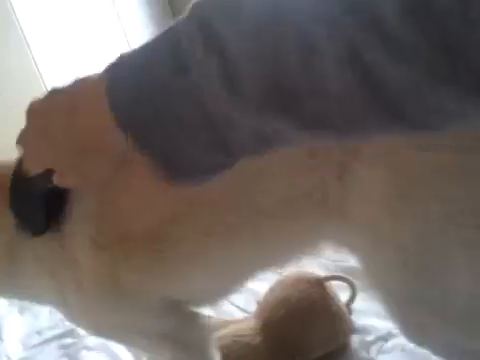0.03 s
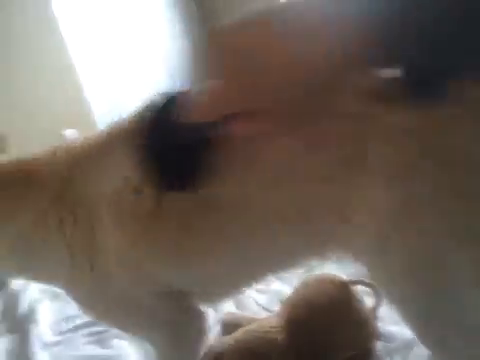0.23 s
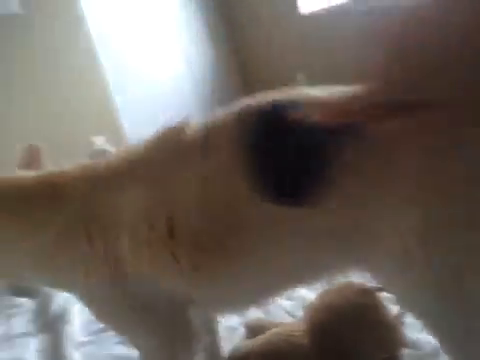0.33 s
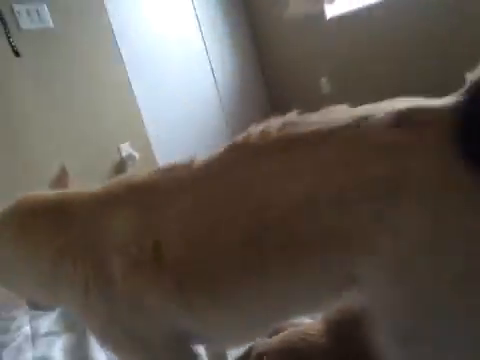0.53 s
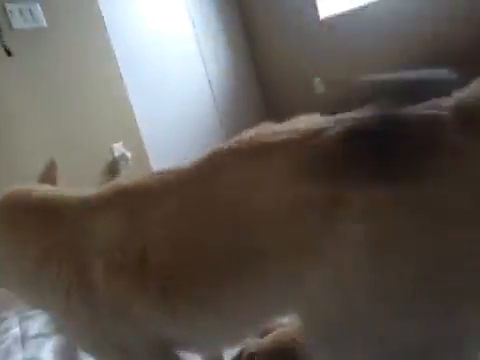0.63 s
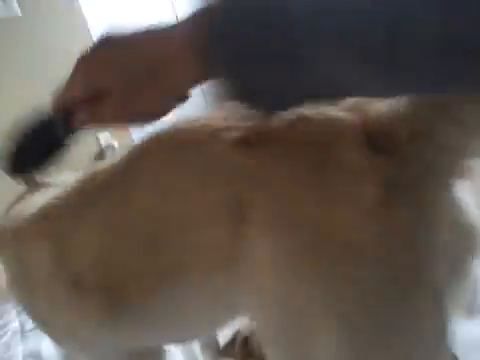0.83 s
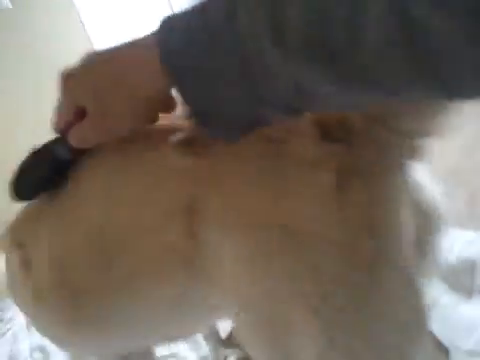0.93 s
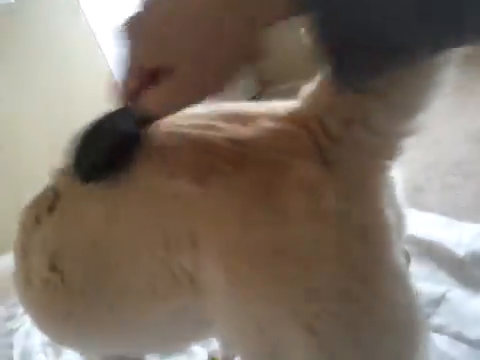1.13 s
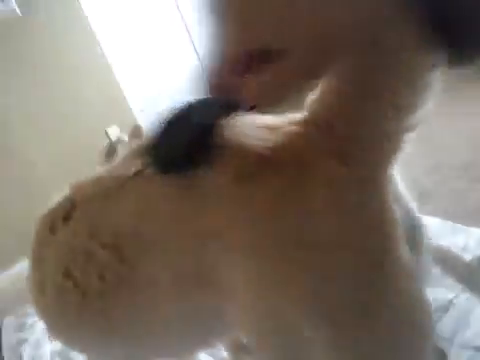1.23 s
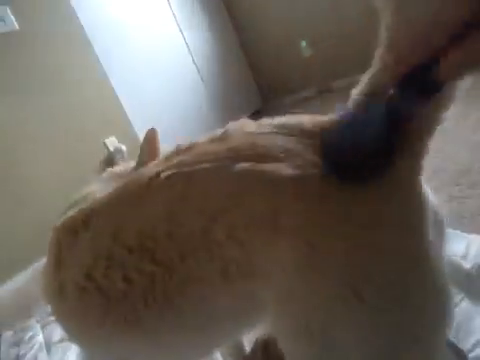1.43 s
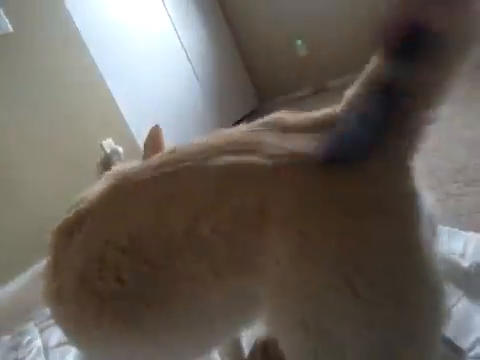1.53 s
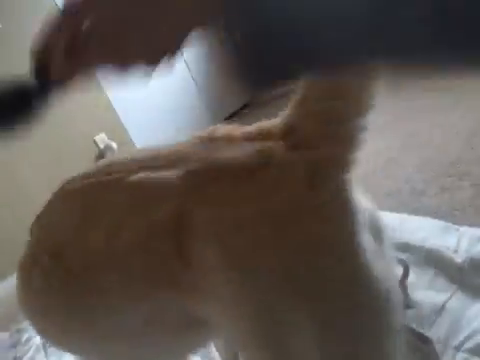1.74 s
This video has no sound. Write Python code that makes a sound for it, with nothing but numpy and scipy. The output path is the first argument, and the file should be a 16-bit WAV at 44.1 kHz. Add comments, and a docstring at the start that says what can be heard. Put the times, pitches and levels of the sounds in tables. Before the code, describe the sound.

A brush makes two scratchy, hissing strokes through a dog's fur, close by.

```python
"""Two scratchy, hissing strokes of a plastic brush along a dog's back, close by in a quiet room.
Thousands of hairs slip off the bristles from neck to rump and sound the hollow back of the brush.
The brush knocks as it lands and catches in the coat. The passing arm puffs air at the microphone,
its sleeve rustles faintly, and the room hums low underneath."""
import sys
import numpy as np
from scipy import signal
from scipy.fft import rfft, irfft, next_fast_len
from scipy.io import wavfile
from scipy.ndimage import map_coordinates

SR = 44100
rng = np.random.default_rng(int(sys.argv[2]) if len(sys.argv) > 2 else 0)


def unload_wav(signal):
    """Save mono or channel-first audio to the path in sys.argv[1] as 16-bit WAV at rate SR, clipped to [-1, 1]."""
    wavfile.write(
        sys.argv[1],
        SR,
        np.round(np.clip(np.atleast_2d(signal).T, -1, 1) * 32767).astype(np.int16),
    )


N = 79380


def brush_strokes():
    """Hairs slip off the bristles in four layers: hollow body, scratch, hiss and a top sheen."""
    # Drag, one table a stroke. Each row: time in seconds, body and scratch levels in dB before trim.
    drags = [
        [(0.16, -50, -59), (0.248, -43.5, -48.5), (0.254, -43, -51), (0.382, -39.5, -39.5),
         (0.464, -40.5, -37.5), (0.564, -41.5, -45), (0.67, -60.5, -63), (0.72, -62.5, -69)],
        [(0.99, -62, -69), (1.04, -63, -57), (1.064, -57.5, -57.5), (1.2, -48.5, -47), (1.208, -50.5, -44),
         (1.304, -45.5, -47.5), (1.452, -43, -44.5), (1.536, -52.5, -56.5), (1.61, -68, -73), (1.62, -66, -85)],
    ]
    # Treble, one table a stroke. Each row: time in seconds, hiss and sheen levels in dB before trim.
    hisses = [
        [(0.16, -65.5, -68), (0.212, -59, -59), (0.346, -55.5, -53.5), (0.39, -51, -51), (0.43, -50, -49.5),
         (0.582, -55, -58.5), (0.682, -78, -76), (0.69, -79, -88), (0.7, -87, -80)],
        [(0.99, -81, -84), (1.002, -68, -75), (1.14, -56, -58.5), (1.214, -52.5, -56), (1.358, -57.5, -56.5),
         (1.442, -56.5, -52), (1.534, -67, -59.5), (1.59, -78, -73), (1.6, -89, -86)],
    ]
    # Resonances of the brush's back. Each row: centre in Hz, width in Hz, lift in dB.
    back_modes = [(310, 18, 2), (500, 12, -2.5), (673, 91, 6.5), (785, 120, 6), (1080, 120, 0.5),
                  (1440, 52, 2), (1710, 110, 1.5), (2530, 150, 0), (4310, 420, 1.5)]
    # Tone colours of the four layers. Each row: frequency in Hz, relative level in dB.
    body_eq = [(120, -15), (210, -12.5), (300, -2.5), (450, -0.5), (700, -5.5), (1000, 0), (1300, -2),
               (1750, -4.5), (2300, -10), (3500, -44), (7000, -94)]
    scratch_eq = [(700, -43), (1500, -3.5), (2200, -1.5), (2900, -2), (3500, -1.5), (4600, -3.5),
                  (5500, -6), (7000, -30), (11000, -65)]
    hiss_eq = [(2500, -32), (5000, -3), (6200, 2.5), (7500, 0), (8800, -9), (11000, -22), (15000, -17)]
    sheen_eq = [(5000, -49), (8000, -0.5), (9800, 0), (12500, -0.5), (14200, -1.5), (15300, -4)]
    body_trim_db, scratch_trim_db, hiss_trim_db, sheen_trim_db = -0.9, -0.6, 1.5, 1
    out = np.zeros(N)
    for drag, treble in zip(drags, hisses):
        body_db, scratch_db = stroke_levels(drag)
        hiss_db, sheen_db = stroke_levels(treble)
        body = coloured(hair_slips(scratch_db), body_eq, back_modes)
        scratch = coloured(hair_slips(scratch_db), scratch_eq, back_modes)
        hiss = coloured(hair_slips(scratch_db), hiss_eq)
        sheen = coloured(hair_slips(scratch_db), sheen_eq)
        out += amp(body_db + body_trim_db) * body + amp(scratch_db + scratch_trim_db) * scratch
        out += amp(hiss_db + hiss_trim_db) * hiss + amp(sheen_db + sheen_trim_db) * sheen
    return out


def hair_slips(drag_db, reference_db=-45, reference_per_s=9000, scatter_db=2):
    """Each slipping hair is a tiny click; a harder drag packs them denser at the same power."""
    chance = np.clip(reference_per_s * amp(drag_db - reference_db) / SR, .07, 1)  # per sample
    sizes = rng.choice([-1, 1], N) * amp(scatter_db * rng.standard_normal(N))
    return (rng.random(N) < chance) * sizes / np.sqrt(chance)


def stroke_levels(rows, fade_db_per_s=469):
    """One dB envelope for each level column, fading away before and after the stroke."""
    t = clock()
    times, *columns = np.transpose(rows)
    outside_s = np.maximum(times[0] - t, 0) + np.maximum(t - times[-1], 0)
    return [np.interp(t, times, db) - fade_db_per_s * outside_s for db in columns]


def hollow_rings():
    """The brush and the air under it ring while it lies flat on the coat."""
    # Each row, one ring: peak time in seconds, level in dB, half length in seconds, pitch and width in Hz.
    rings = [(0.456, -47.5, 0.075, 670, 109), (0.45, -47.5, 0.069, 2260, 900), (1.2, -54, 0.05, 754, 200),
             (1.278, -53.5, 0.13, 472, 108), (1.352, -49.5, 0.061, 708, 183), (1.444, -48, .05, 1850, 800)]
    out = np.zeros(N)
    for peak, db, half_length, hz, width in rings:
        bandpass = lambda f: 1j * f * width / (hz ** 2 - f ** 2 + 1j * f * width)
        cavity = filtered(rng.standard_normal(N), lambda f: bandpass(f) ** 2)
        out += swell(peak, db, half_length) * unit(cavity)
    return out


def landing_knocks(attack_s=0.00041):
    """The plastic back gives a short hollow tock as the brush lands."""
    # Landings. Each row: start in seconds, level in dB, pitch factor.
    landings = [(0.105, -46, 1.0), (0.1476, -29, 1.0), (0.972, -49, 0.6)]
    # Modes of the plastic. Each row: base frequency in Hz, relative level in dB, t60 in seconds.
    modes = [(936, 4, 0.013), (1410, -2.5, 0.013), (620, 0, 0.0072), (270, -13, 0.021), (3060, -11, 0.0079),
             (3840, -14, 0.0084)]
    out = np.zeros(N)
    for start, db, pitch in landings:
        t = np.maximum(clock() - start, 0)
        ring = sum(amp(mode_db - 60 * t / t60) * np.sin(2 * np.pi * hz * pitch * t)
                   for hz, mode_db, t60 in modes)
        out += amp(db) * ring * (1 - np.exp(-t / attack_s))
    return out


def bristle_catches(rise_s=0.0035):
    """A brief soft burst of slips as the bristles enter the fur."""
    # Catches in the coat. Each row: start in seconds, level in dB, t60 in seconds.
    catches = [(0.967, -54, 0.14), (1.026, -50, 0.12)]
    # Their tone colour. Each row: frequency in Hz, relative level in dB.
    catch_eq = [(300, -16), (1200, 1), (3200, 0), (5000, -9), (6500, -4), (14000, -22)]
    out = np.zeros(N)
    for start, db, t60 in catches:
        t = np.maximum(clock() - start, 0)
        envelope = amp(db - 60 * t / t60) * (1 - np.exp(-t / rise_s))
        out += envelope * coloured(hair_slips(db), catch_eq)
    return out


def air_puffs():
    """The moving arm wafts air over the microphone in soft, deep thumps."""
    # Wafts. Each row: peak time in seconds, level in dB, rise and fall time constants in seconds.
    puffs = [(0.476, -41, 0.0077, 0.15), (0.835, -54.5, 0.017, 0.061), (0.95, -53.5, 0.018, 0.11),
             (1.39, -59, 0.052, .08)]
    # Bass-heavy colour of the air. Each row: frequency in Hz, relative level in dB.
    air_eq = [(12, -23), (28, -1), (40, 6), (58, -1.5), (90, -9.5), (200, -28.5), (600, -65)]
    t = clock()
    envelope = sum(amp(db) * np.exp(-np.maximum((peak - t) / rise, (t - peak) / fall))
                   for peak, db, rise, fall in puffs)
    return envelope * coloured(rng.standard_normal(N), air_eq)


def sleeve_rustle():
    """A faint whisper of cloth as the arm swings back."""
    # Arm swings. Each row: peak time in seconds, level in dB, half length in seconds.
    swings = [(0.116, -66, .05), (0.853, -67, 0.11), (1.79, -68.5, 0.079)]
    # Bright colour of the cloth. Each row: frequency in Hz, relative level in dB.
    cloth_eq = [(300, -28), (1200, -7), (4000, -1), (9000, 0.5), (14500, -7)]
    return sum(swell(*swing) for swing in swings) * coloured(rng.standard_normal(N), cloth_eq)


def room_reverb(x, t60_s=0.09, wet_db=-12.5):
    """The short answer of a softly furnished room."""
    t = np.arange(SR // 2) / SR
    tail = rng.standard_normal(len(t)) * amp(-60 * t / t60_s)
    return amp(wet_db) * signal.fftconvolve(x, tail / np.linalg.norm(tail))[:N]


def room_tone(noise_db=-56, hum_hz=77.3, hum_db=-56.5, waver_db=1.5):
    """A bed of low rumble, faint hiss and a wavering hum."""
    # Colour of the rumble and hiss. Each row: frequency in Hz, relative level in dB.
    room_eq = [(15, -8), (40, -2.5), (80, -3), (120, -9), (180, -15), (300, -13.5), (500, -25), (1000, -22),
               (2000, -25.5), (4000, -32), (9000, -34.5), (14500, -38.5)]
    phase = 2 * np.pi * hum_hz * clock() + 0.9 * wobble(5.4)
    hum = unit(amp(waver_db * wobble(8.86)) * np.sin(phase))
    return amp(hum_db) * hum + amp(noise_db) * coloured(rng.standard_normal(N), room_eq)


def amp(db):
    """Decibels to gain."""
    return 10 ** (np.asarray(db) / 20)


def unit(x):
    """x at rms 1."""
    return x / np.sqrt(np.mean(x ** 2) + 1e-20)


def clock():
    """The time of each sample in seconds."""
    return np.arange(N) / SR


def swell(peak_s, db, half_length_s):
    """A bell-shaped gain envelope."""
    return amp(db) * np.exp(-((clock() - peak_s) / half_length_s) ** 2)


def wobble(knots_per_s):
    """A smooth random curve."""
    return map_coordinates(rng.standard_normal(256), [clock() * knots_per_s], mode="wrap")


def filtered(x, response):
    """x through a filter whose gain at each frequency is response(hz)."""
    size = next_fast_len(N + SR // 2)
    return irfft(rfft(x, size) * response(np.fft.rfftfreq(size, 1 / SR)), size)[:N]


def coloured(x, eq, resonances=()):
    """x through an EQ curve with resonant bumps, at rms 1."""
    eq_hz, eq_db = np.transpose(eq)

    def response(hz):
        curve_db = np.interp(np.log(hz + 1), np.log(eq_hz), eq_db)
        lift_db = sum(db / (1 + (2 * (hz - centre) / width) ** 2) for centre, width, db in resonances)
        return amp(curve_db + lift_db)
    return unit(filtered(x, response))


def scene():
    """The brush and its reverb, with the moving arm and the room tone behind."""
    brush = brush_strokes() + hollow_rings() + landing_knocks() + bristle_catches()
    return (brush + room_reverb(brush) + sleeve_rustle() + air_puffs() + room_tone())[None]


def record(dry):
    """The microphone opens after a moment and keeps nothing above its band limit."""
    open_s, top_hz = 0.105, 15290
    return filtered(dry[0] * (clock() >= open_s), lambda hz: hz < top_hz)[None]


dry = scene()
out = record(dry)
unload_wav(out)
```